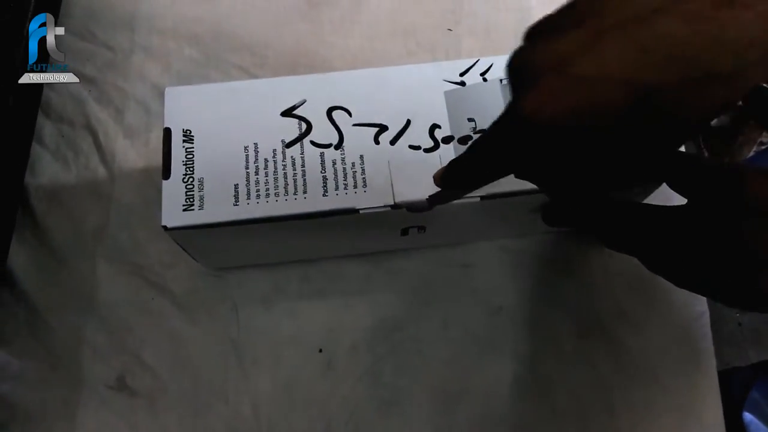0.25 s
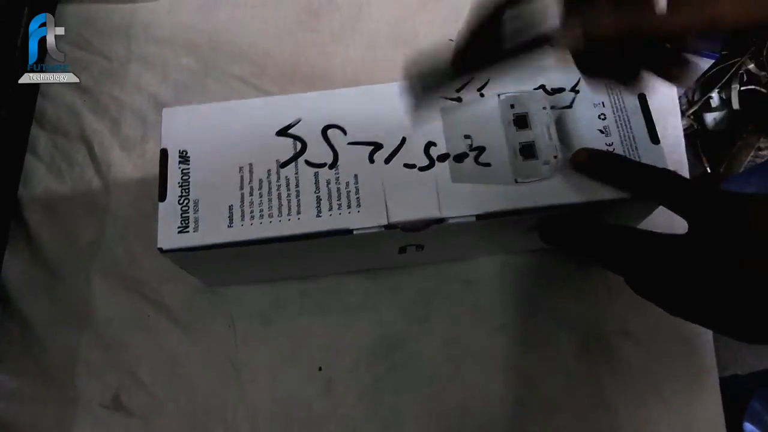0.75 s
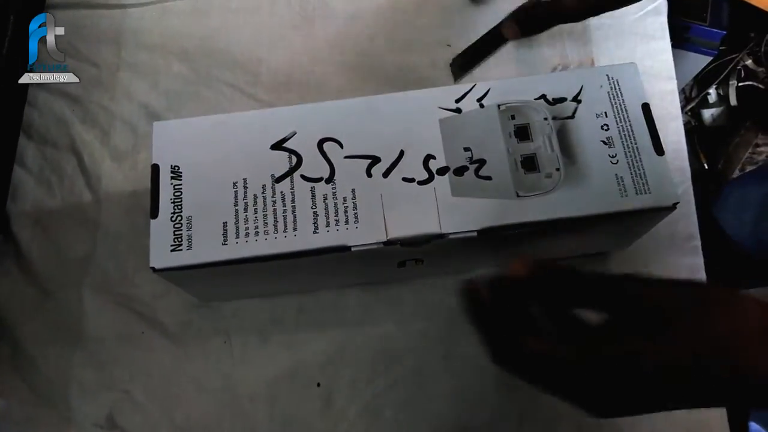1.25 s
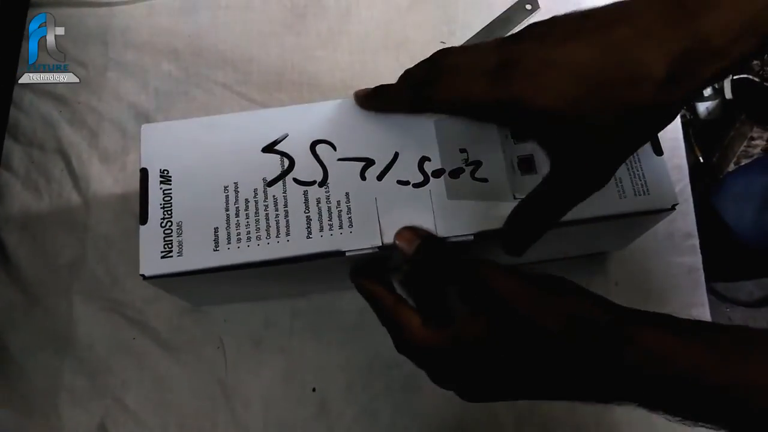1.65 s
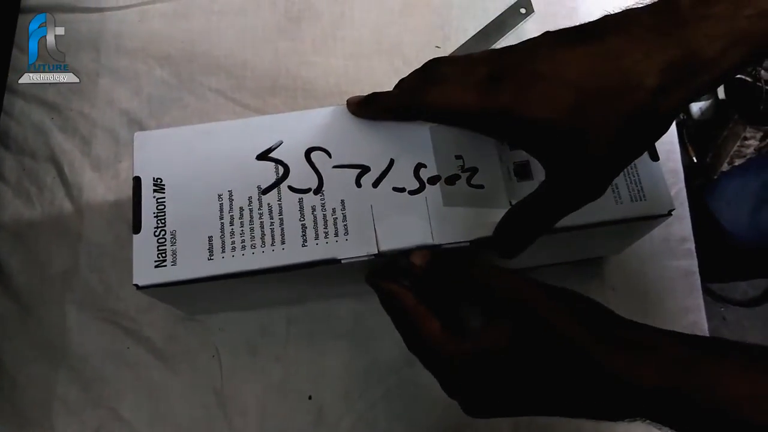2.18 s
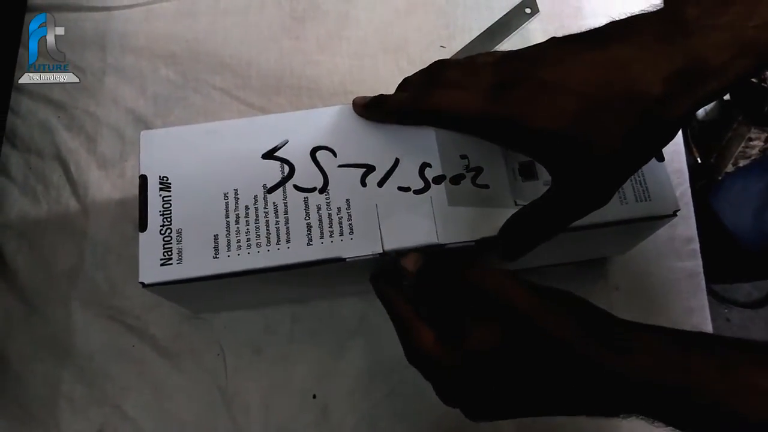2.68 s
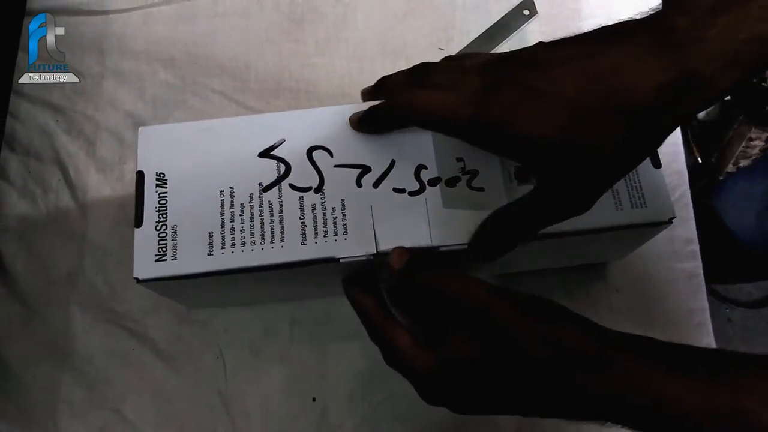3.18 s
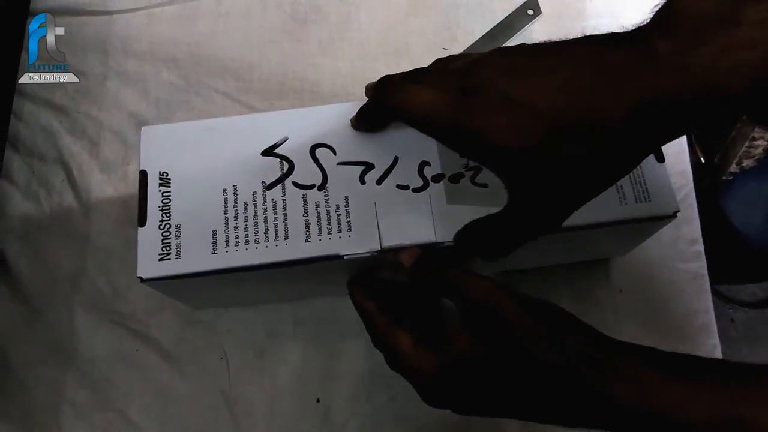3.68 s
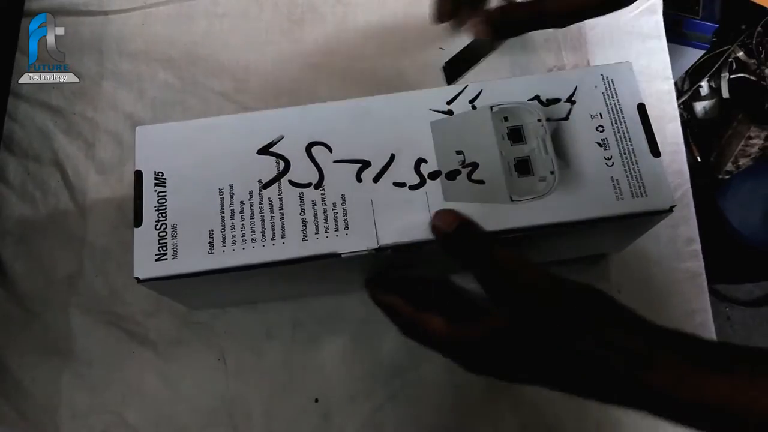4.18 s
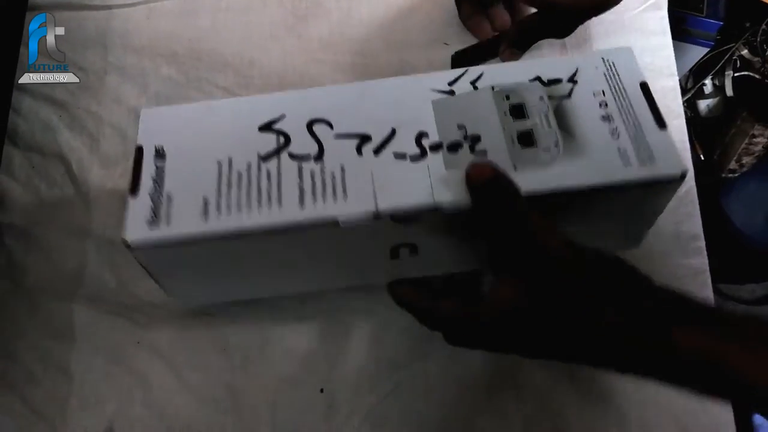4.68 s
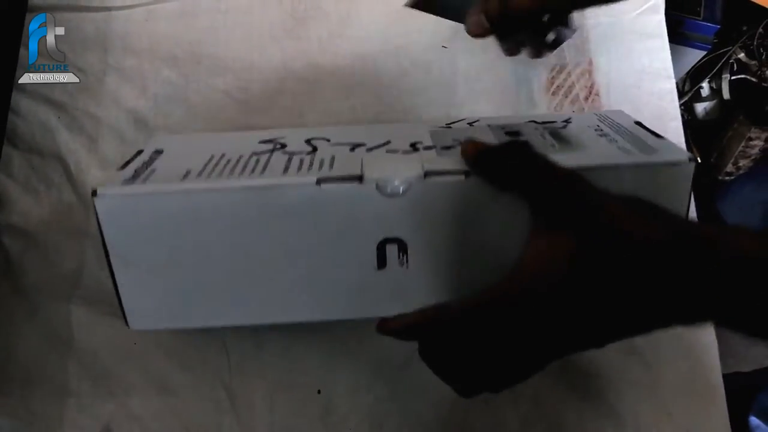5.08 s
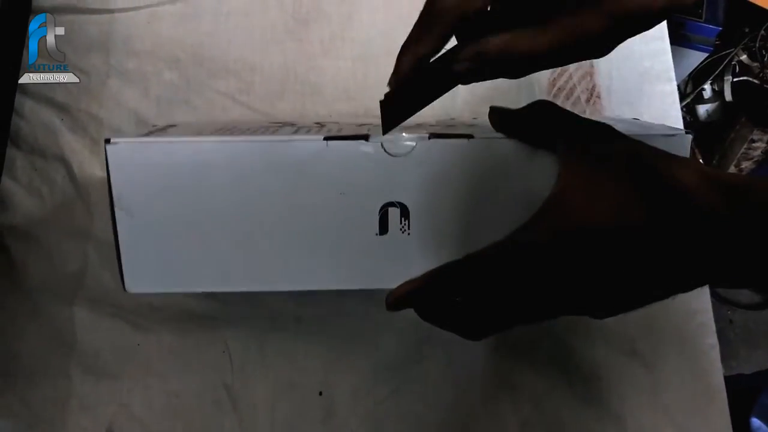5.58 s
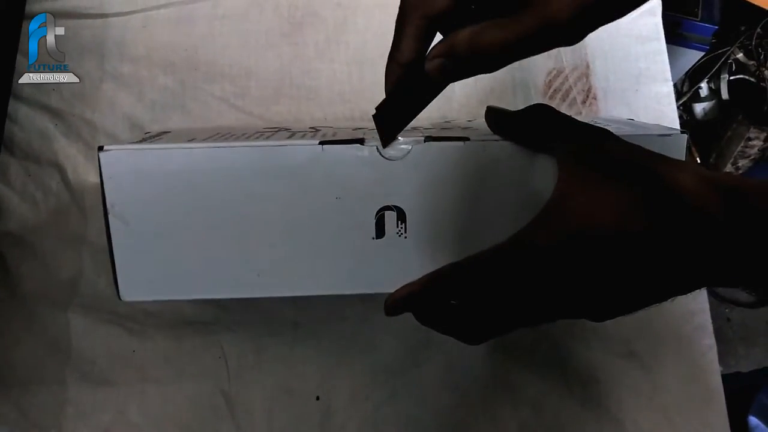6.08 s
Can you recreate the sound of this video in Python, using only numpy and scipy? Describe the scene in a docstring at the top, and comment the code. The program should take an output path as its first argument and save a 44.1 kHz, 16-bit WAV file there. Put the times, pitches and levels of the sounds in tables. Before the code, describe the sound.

A close stereo microphone in a small room with faint low rumble, light hiss and a short tail. From 0 to 0.6 seconds, fingers rub card and tape ticks weakly; a soft hollow box thump falls at 0.7. At about 1.17 a steel blade lands flat on the table with a hard clack and brief bright ring. Tape and card snaps resume at 1.3, with a strong crack at 1.95, scattered clicks after 2.1 and a dense crackling run at 2.7 to 2.8. At 3.3 the box face buckles with a dull, rounded pop. More snaps and rubs cluster at 3.8 to 4.0. From 4.4 to 5.0 the box is turned over cloth: low hollow drone, scuff, small juddering squeaks and boomy thumps around 4.7 to 4.85. It is then nearly quiet, until small cracks at 6.1 and 6.3 and a thin, raspy, wavering blade squeak from 6.25 to the end.

```python
"""Opening a taped box

Hands work at the taped flap of a long cardboard box on a table in a small room: tape and card snap as noise bursts,
fingers rub as patchy hiss, and short swelling sines give finger taps and juddering squeaks. A steel blade lands with
a clink of ringing modes, the box thumps and is rolled over cloth with a resonant drone and a scuff, and at last the
blade squeaks in the seal as a wavering tone with overtones. A low room rumble of shaped noise lies under it all."""
import sys
import numpy as np
from scipy import signal
from scipy.fft import rfft, irfft, next_fast_len
from scipy.io import wavfile
from scipy.ndimage import uniform_filter1d, map_coordinates

SR = 44100
rng = np.random.default_rng(int(sys.argv[2]) if len(sys.argv) > 2 else 0)


def generate_wav(signal):
    """Clip the signal to [-1, 1] and save it as 16-bit WAV at the path in sys.argv[1]."""
    frames = np.transpose(np.atleast_2d(signal))
    scaled = np.clip(frames, -1, 1) * 32767
    pcm = np.round(scaled).astype(np.int16)
    wavfile.write(sys.argv[1], SR, pcm)


N = 279977

# Levels in event tables are relative: each sound function may add its own trim.
# Spectrum of the room's air. Each row: frequency in Hz, relative level in dB.
RUMBLE_SPECTRUM = [(25, -14.5), (50, -3), (100, -5), (200, -12.5), (350, -22.5), (600, -27), (1200, -37),
                   (3000, -43), (14000, -58)]
# Swelling of the room's murmur. Each row: time in seconds, relative level in dB.
MURMUR_LEVEL = [(0.0, -59.5), (0.56, -54), (1.93, -62), (2.08, -57), (3.13, -67), (3.34, -54),
                (3.73, -66.5), (3.96, -52), (4.42, -61), (4.85, -44), (4.98, -57.5), (6.35, -64)]
# Fingers sliding on card and tape peeling.
# Each row: start in seconds, length in seconds, relative level in dB, treble tilt in dB per octave.
STROKES = [(0, 0.12, -52, -3.5), (0.27, 0.035, -48, -7.5), (0.47, 0.08, -38.5, -4),
           (0.74, 0.2, -64.5, -7.5), (0.911, 0.16, -58.5, 12), (1.409, 0.14, -50, 3.5),
           (1.855, 0.13, -42, 4.5), (2.118, 0.044, -45.5, -1.5), (2.348, 0.027, -42, -1),
           (2.486, .045, -49.5, 4.5), (2.687, 0.038, -38, -11), (3.023, 0.08, -59, 15),
           (3.87, 0.022, -29, -7), (3.948, 0.081, -37.5, 1), (4.102, 0.066, -53, 8.5),
           (4.532, 0.22, -49.5, -1), (4.732, 0.148, -48.5, 1), (5.09, 0.085, -61.5, 0.5),
           (5.168, 0.093, -55.5, 1.5), (5.9, 0.11, -76.5, -2), (6.283, 0.036, -38, -8)]
# Spectrum of skin on card. Each row: frequency in Hz, level in dB.
SKIN_SPECTRUM = [(600, -42), (1100, -17), (1500, -14), (2300, -11), (3200, -7.5), (5000, -1), (7200, 6.5),
                 (9000, -5), (12000, -6), (14500, -7.5), (16000, -24.5)]
# Tape and card giving way.
# Each row: time in seconds, relative crack level in dB, relative card level in dB, treble tilt in dB per octave.
SNAPS = [(0.126, -32.5, -62, 15), (0.2651, -27, -74, -23), (0.398, -38, -53, 15), (0.454, -27, -76, 8),
         (0.48, -15.5, -44, 5), (0.5374, -14.5, -46, -14), (0.5495, -15.5, -55.5, 3.5),
         (1.3083, -13, -44, -5.5), (1.489, -10, -58, -1), (1.5915, -10, -59.5, -6.5),
         (1.5993, -8.5, -52, -2), (1.952, 5.5, -25.5, -1.85), (1.9793, -7, -41, 0.2),
         (2.1345, -12, -53.5, 4.5), (2.2932, -13.5, -53, 4.5), (2.3045, -2.5, -45, -3.5),
         (2.3775, -5, -44.5, 0), (2.6942, 3, -37.5, 8), (2.7009, -6, -43, 8.5), (2.7106, -2.5, -41, -1),
         (2.7214, 3, -45.5, -1.5), (2.7392, -5, -36.5, 6.5), (2.7532, 0.5, -33.5, -3),
         (2.7761, -10, -35, -3), (2.9103, -16, -65, -9.5), (3.3, -9.5, -37, 14.5), (3.3632, -7.5, -47, -3),
         (3.4488, -17, -67, 10.5), (3.461, -12, -65.5, 0.5), (3.7765, -14.5, -59, 2),
         (3.8159, -16, -50.5, -1.5), (3.8834, -16.5, -28, 5), (3.8875, -8, -29, -2.5),
         (3.9632, -2.5, -33, 6.5), (3.982, 1.5, -34, 1), (4.4202, -6.5, -70.5, 5.5), (4.5179, -9.5, -66, 7),
         (4.744, -28, -65, 9), (5.401, -35, -74, 2), (5.4141, -20, -73.5, 1.5), (5.7771, -44.5, -78, -6),
         (6.115, -13, -55.5, -2.5), (6.3056, -13, -48, 7), (6.3185, -8.5, -62, 2)]
# Spectrum of cracking tape. Each row: frequency in Hz, level in dB.
CRACK_SPECTRUM = [(100, -53.5), (1500, -28.5), (2400, -30.5), (3000, 1.5), (5300, 6.5), (6800, 10),
                  (8700, -2.5), (11500, -8.5), (14000, -7), (16000, -20.5)]
# Spectrum of barking card. Each row: frequency in Hz, level in dB.
CARD_SPECTRUM = [(100, -37), (450, -8.5), (700, -16.5), (1200, -3.5), (1600, 1), (2200, -4), (3000, 2.5),
                 (5000, -11.5), (16000, -55.5)]
# Resonances of a flexing face of the box. Each row: frequency in Hz, width in Hz, level in dB.
PANEL_RESONANCES = [(437.4, 140, -5), (590, 43, -3)]
# The box knocks on the table. Each row: start in seconds, air cavity level in dB, wall level in dB.
THUMPS = [(0.484, -41, -60.5), (0.706, -19.5, -43.5), (0.826, -35.5, -79), (1.175, -48.5, -48.5),
          (1.954, -62, -51), (3.303, -54, -44.5), (3.985, -62, -53), (4.691, -20, -76), (4.778, -20.5, -65),
          (4.834, -19, -76), (4.95, -44.5, -85.5)]
# Modes of the air in the box. Each row: frequency in Hz, level in dB, 60 dB decay time in seconds.
CAVITY_MODES = [(112.5, 5.5, 0.33), (85.16, -15.5, 0.62), (156, -9, 0.36), (200.4, -14.5, 0.48)]
# Resonances of the box walls. Each row: frequency in Hz, width in Hz, level in dB.
WALL_RESONANCES = [(214, 8.2, 6), (286.6, 43, 2), (359, 20, -0.5), (560.3, 22, 0.5), (995, 32, -12),
                   (1200, 54, -41), (1820, 210, -20)]
# Spectrum of the shudder that drives the walls. Each row: frequency in Hz, level in dB.
SHUDDER_SPECTRUM = [(1500, 6.5), (2500, 2), (6000, -5.5)]
# Short notes from the card: finger taps on the box face near 560-590 Hz, juddering squeaks at other pitches.
# Each row: centre time in seconds, pitch in Hz, level in dB, width of the swell in seconds.
CHIRPS = [(0.485, 587, -40.5, 0.015), (0.51, 1470, -53.5, 0.065), (0.884, 568, -36, 0.013),
          (1.059, 1360, -61, 0.036), (1.312, 567, -33.5, 0.0074), (4.357, 1233, -60.5, 0.023),
          (4.413, 799, -49, 0.041), (4.688, 590, -39, 0.027), (4.747, 955, -28, 0.041),
          (4.815, 564, -31.5, 0.03)]
# Modes of the blade. Each row: frequency in Hz, relative level in dB, 60 dB decay time in seconds.
STEEL_MODES = [(478, -2.5, 0.13), (2300, -15, .19), (3333, 8, 0.061), (4300, -15, .17), (5227, -10, .2),
               (6360, -3, 0.36), (7040, -5.5, 0.33), (7650, -5.5, 0.3), (7700, -21, .18),
               (8040, -6.5, 0.18), (8950, -12.5, 0.16), (10600, -21.5, 0.14), (12400, -29, 0.12),
               (13100, -24.5, .18)]
# Spectrum of the table under the blade. Each row: frequency in Hz, level in dB.
TABLE_SPECTRUM = [(150, -39.0), (500, -1.5), (1400, 1.5), (3300, 5.5), (5000, -1.0), (8000, -18.5), (14000, -52.0)]
# The box is pushed over the cloth.
# Each row: start in seconds, time until the fall in seconds, drone level in dB, scuff level in dB.
SHOVES = [(4.40, 0.053, -34.5, -56.5), (4.674, 0.14, -35.5, -35), (4.95, 0.088, -47.5, -71.5)]
# Spectrum of the scuff. Each row: frequency in Hz, level in dB.
SCUFF_SPECTRUM = [(120, -34), (280, 5.5), (560, 3.5), (720, -10), (950, -6), (1300, -9.5), (1700, -32),
                  (2500, -53), (3800, -39.5), (6000, -48)]
# The blade sticks and slips in the seal. Each row: time in seconds, pitch in Hz, relative fundamental level in dB,
# overtone level in dB, overtone tilt in dB per octave.
SQUEAK_PATH = [(6.246, 486, -85, -100, 8), (6.251, 497.3, -39.5, -40, 12), (6.271, 499, -44, -44.5, 0),
               (6.279, 493.5, -30.5, -43, -4), (6.31, 490.4, -28.5, -46.5, -6.5),
               (6.35, 496, -31.5, -47, -11)]
# Overtones of the squeak. Each row: multiple of the pitch, relative level in dB.
OVERTONES = [(3, 1), (4, -13), (5, -2.5), (6, -19), (7, -3), (8, -12), (9, -5), (11, -7.5), (13, -18)]
# Spectrum of the scrape in the squeak. Each row: frequency in Hz, level in dB.
GRIT_SPECTRUM = [(900, -25), (1500, -3), (3500, 0), (5500, -3), (9000, -16)]
# Decay of the room. Each row: frequency in Hz, 60 dB decay time in seconds.
ROOM_DECAY = [(100, 0.14), (500, .36), (1500, 0.24), (4000, 0.41), (8000, 0.38), (14000, 0.4)]
# Colour of the room's tail. Each row: frequency in Hz, level in dB.
ROOM_SPECTRUM = [(120, 4.0), (450, 5.0), (1500, 4.5), (4000, -2.5), (7000, -7.5), (12000, -7.0)]
# Diffuse sound at the two ports. Each row: frequency in Hz, left-right likeness from 0 to 1.
LIKENESS = [(150, 0.96), (500, 0.65), (1200, 0.12), (3000, .1)]
# Balance of the microphone ports. Each row: frequency in Hz, left minus right in dB.
PORT_BALANCE = [(150, -1.5), (450, -0.5), (800, -2.5), (1500, -2.5), (2500, -1), (4700, 3.5), (6700, 4.5),
                (9000, 0), (10300, -16.5), (12000, -25.5), (14000, -14.5), (15500, -9.5)]
# Response shared by both ports. Each row: frequency in Hz, level in dB.
PORT_RESPONSE = [(25, -16.5), (38, -8.5), (48, -0.5), (5000, -1.0), (9000, 3.0), (12000, 1), (14200, -0.5), (14800, -10)]


def amp(db):
    """Decibels to gain."""
    return 10 ** (np.asarray(db) / 20)


def unit(x):
    """Scale x to an rms of 1."""
    return x / np.sqrt(np.mean(x ** 2) + 1e-20)


def along(points, hz):
    """Read a curve of (Hz, value) points on a log frequency axis."""
    f, v = np.transpose(points)
    return np.interp(np.log(hz + 1), np.log(f + 1), v)


def curves(rows):
    """Draw one value per sample for each column after the time."""
    s, *columns = np.transpose(rows)
    return [np.interp(np.arange(N) / SR, s, column) for column in columns]


def during(rows):
    """A soft gate, open for the span of a curve."""
    t = np.arange(N) / SR
    is_open = (t > rows[0][0]) & (t < rows[-1][0])
    return uniform_filter1d(1. * is_open, size=128)


def wobble(rate):
    """A smooth random curve with rate knots a second."""
    knots = rng.standard_normal(int(N * rate / SR) + 4)
    return map_coordinates(knots, [np.arange(N) * rate / SR])


def filtered(x, response):
    """Multiply the spectrum of x by a complex response of frequency."""
    n = x.shape[-1]
    m = next_fast_len(n + 8192)
    return irfft(rfft(x, m) * response(np.fft.rfftfreq(m, 1 / SR)), m)[..., :n]


def coloured(x, points):
    """Shape x with a causal, minimum-phase filter through (Hz, dB) points."""
    size = 1024
    gain = amp(along(points, np.fft.rfftfreq(size, 1 / SR)))
    cepstrum = irfft(np.log(gain))
    # folding the cepstrum forward puts all the energy after the onset
    cepstrum[1:size // 2] *= 2
    cepstrum[size // 2 + 1:] = 0
    impulse = irfft(np.exp(rfft(cepstrum)))
    return signal.fftconvolve(x, impulse)[:len(x)]


def tilted(points, tilt):
    """Lean a (Hz, dB) shape about 8 kHz by tilt dB per octave, holding the lean below 2.5 kHz."""
    return [(hz, db + tilt * np.log2(max(hz, 2500) / 8000)) for hz, db in points]


def resonate(x, peaks):
    """Drive parallel (Hz, width, dB) resonances with x."""
    def response(f):
        return sum(amp(db) * 1j * f * w / (c * c - f * f + 1j * f * w) for c, w, db in peaks)
    return filtered(x, response)


def ring(modes, t):
    """Sum decaying sine modes, at slightly new strengths for each blow."""
    out = 0
    for hz, db, t60 in modes:
        strength = db + rng.normal(0, 1)
        out = out + amp(strength - 60 * t / t60) * np.sin(2 * np.pi * hz * t)
    return out


def add(track, s, sound):
    """Mix a sound into a track at time s."""
    part = track[..., max(round(s * SR), 0):][..., :sound.shape[-1]]
    part += sound[..., :part.shape[-1]]


def burst(t, t60, linger_db, linger_t60, lead_db=-24, lead_rise=0.00073):
    """Noise with a faint lead around t = 0, a fast burst after it and a weaker lingering decay."""
    after = np.maximum(t, 0)
    decay = amp(-60 * after / t60) + amp(linger_db - 60 * after / linger_t60)
    onset = 1 - np.exp(-after / 0.0007)
    lead = amp(lead_db) * np.exp(-np.abs(t) / lead_rise)
    return (decay * onset + lead) * rng.standard_normal(len(t))


def diffuse(pair):
    """Blend two unrelated signals for the ports: alike in the bass, apart in the treble."""
    def response(hz):
        turn = np.arccos(np.clip(along(LIKENESS, hz), -1, 1)) / 2
        return np.array([np.cos(turn), np.sin(turn)])
    mid, side = filtered(pair, response)
    return np.array([mid + side, mid - side])


def rumble(level_db=8, hum_db=-65, hiss_db=-53, throb_db=2):
    """A low noise murmur swells and sinks over a steady faint hiss and a weak 44 Hz hum."""
    level, = curves(MURMUR_LEVEL)
    noise = rng.standard_normal((2, N))
    air = unit(diffuse(filtered(noise, lambda hz: amp(along(RUMBLE_SPECTRUM, hz)))))
    murmur = filtered(air, lambda hz: 1 / (1 + (hz / 260) ** 4))
    hiss = air - murmur
    hum = unit(np.sin(2 * np.pi * 44.0 * np.arange(N) / SR) * amp(1.5 * wobble(5)))
    return amp(level + level_db + throb_db * wobble(10)) * murmur + amp(hiss_db) * hiss + amp(hum_db) * hum


def rub(catch_db=-2, catches_per_s=250, patchy_db=6.5, jerky_db=4, rise_s=.008, edge_s=.003):
    """Skin hisses over the card in shifting patches of noise and catches on single fibres as random clicks."""
    fibres = (rng.random(N) < catches_per_s / SR) * amp(8.4 * rng.standard_normal(N))
    friction = rng.standard_normal(N) + amp(catch_db) * unit(fibres)
    z = signal.stft(friction, nperseg=512)[2]
    # random gains, smoothed over frequency and then over time
    patches = uniform_filter1d(rng.standard_normal(z.shape), size=3, axis=0)
    patches = unit(uniform_filter1d(patches, size=6, axis=1))
    slide = signal.istft(z * amp(patchy_db * patches), nperseg=512)[1][:N]
    slide = slide * amp(jerky_db * wobble(70))
    out = np.zeros(N)
    for s, length, db, tilt in STROKES:
        piece = slide[round(s * SR):][:round(length * SR)]
        t = np.arange(len(piece)) / SR
        fade = np.tanh(t / rise_s) * np.tanh(t[::-1] / edge_s)
        add(out, s, amp(db) * fade * unit(coloured(piece, tilted(SKIN_SPECTRUM, tilt))))
    return out


def crackling(crack, before_db=-23, before_s=0.0025, after_db=-24, after_s=0.014, count=2):
    """A weak fibre parts just before each crack and a few more follow, as faint shifted copies."""
    out, chance = crack.copy(), rng.standard_normal((count + 1, 2))
    for k, (when, size) in enumerate(chance):
        s, db = (k * after_s, after_db) if k else (-before_s, before_db)
        shift = round(np.clip(s * np.exp(0.3 * when), -0.01, 0.04) * SR)
        out += amp(db + 2 * size) * np.roll(crack, shift, axis=-1)
    return out


def rippled(x, depth_db, width_hz):
    """The sheet beams some frequencies at the ports and others past them: a random ripple in the spectrum."""
    def gain(hz):
        return amp(depth_db * map_coordinates(rng.standard_normal(1200), [hz / width_hz]))
    return filtered(x, gain)


def flexing(t):
    """The face of the box rings after a short push at t = 0."""
    push = (t > 0) * (1 - t / 0.00085) * np.exp(-np.abs(t) / 0.00082)
    return unit(resonate(push, PANEL_RESONANCES))


def snaps(crack_db=-28, card_db=-3, flex_db=-18.5, apart_db=-6, skew_db=-4, delay_s=.0008):
    """Each snap is a bright crack, a bark of the card and a push on the face, which also pops once.

    Returns the stereo sound sent to the ports and the mono sound sent all round."""
    sheets, flex, around = np.zeros((2, N)), pop(), np.zeros(N)
    t = np.arange(-SR // 80, SR // 16) / SR
    face = flexing(t)
    for s, crack, card, tilt in SNAPS:
        start = s + delay_s + t[0]
        slope = tilted(CRACK_SPECTRUM, tilt)
        # a common part and a difference part: the two ports see the tape from different sides
        tape = np.array([unit(coloured(burst(t, t60=0.0032, linger_db=-27, linger_t60=0.045), slope))
                         for _ in range(2)])
        bark = np.array([unit(coloured(burst(t, t60=0.03, linger_db=-19.0, linger_t60=0.11), CARD_SPECTRUM))
                         for _ in range(2)])
        sheet = amp(crack + crack_db) * crackling(tape) + amp(card + card_db) * bark
        # the ripple leaves the strength of each part as it was
        beamed = [np.std(part) * unit(rippled(part, depth_db=5.0, width_hz=400)) for part in sheet]
        add(sheets, start, np.array(beamed))
        add(around, start, sheet[0])
        add(flex, start, amp(card + flex_db) * face)
    late_flex = np.roll(flex, SR // 1800)
    mid = sheets[0] + flex
    side = amp(apart_db) * sheets[1] + amp(skew_db) * late_flex
    return np.array([mid + side, mid - side]), around + flex


def thumps(cavity_rise_s=0.0066, rattle_t60=0.11):
    """Soft blows: the walls shudder at once, the hollow of the box swells and booms."""
    out, t = np.zeros(N), np.arange(SR // 2) / SR
    for s, cavity_db, wall_db in THUMPS:
        shudder = coloured(burst(t, t60=0.027, linger_db=-22, linger_t60=rattle_t60), SHUDDER_SPECTRUM)
        boom = ring(CAVITY_MODES, t) * (1 - np.exp(-t / cavity_rise_s))
        add(out, s, amp(cavity_db) * boom)
        add(out, s, amp(wall_db) * unit(resonate(shudder, WALL_RESONANCES)))
    return out


def chirps(waver_rad=0.78):
    """Finger taps on the box face and juddering squeaks: short sines that swell, waver in phase and fade."""
    out, t = np.zeros(N), np.arange(-SR // 10, SR // 10) / SR
    for s, hz, db, length in CHIRPS:
        drift = map_coordinates(rng.standard_normal(40), [np.linspace(0, 39, len(t))])
        note = np.sin(2 * np.pi * hz * t + waver_rad * drift)
        add(out, s + t[0], amp(db) * np.exp(-(2 * t / length) ** 2) * note)
    return out


def clink(s=1.1745, ring_db=-32, clack_db=-39, tick_db=-39, chatter=0.46):
    """The blade lands flat on the table: a clack, a hard tick and a short steel ring that chatters."""
    out, t = np.zeros(N), np.arange(SR // 2) / SR
    clack = coloured(burst(t, t60=0.02, linger_db=-21, linger_t60=0.13), TABLE_SPECTRUM)
    tick = coloured(1. * (t == 0), TABLE_SPECTRUM)
    steel = sum(ring([mode], t) * (1 + chatter * wobble(110)[:len(t)]) for mode in STEEL_MODES)
    add(out, s, amp(ring_db) * steel + amp(clack_db) * unit(clack))
    add(out, s + 0.0014, amp(tick_db) * unit(tick))
    return out


def pop(s=3.3016, hz=453.3, level_db=-8, rise_s=0.0022):
    """The pressed face of the box buckles once and swings through a few strongly damped cycles."""
    out, t = np.zeros(N), np.arange(SR // 16) / SR
    u = t / rise_s
    swing = (u * np.exp(1 - u)) ** 3 * np.sin(2 * np.pi * hz * t)
    add(out, s, amp(level_db) * swing)
    return out


def swell(s, length, rise_s, fall_db_per_s):
    """A push builds up from s and dies away once its length is over."""
    t = np.arange(N) / SR - s
    return np.clip(t / rise_s, 0, 1) ** 2 * amp(-fall_db_per_s * np.maximum(t - length, 0))


def roll(slips_per_s=260):
    """The turning box drags over the cloth in small dull slips; its hollow drones and a slower scuff builds up."""
    drone = sum(amp(db) * swell(s, length, rise_s=0.028, fall_db_per_s=136) for s, length, db, _ in SHOVES)
    scuff = sum(amp(db) * swell(s, length, rise_s=0.063, fall_db_per_s=305) for s, length, _, db in SHOVES)
    slips = unit((rng.random(N) < slips_per_s / SR) * rng.standard_normal(N))
    jerks = slips + .5 * rng.standard_normal(N)
    hollow = unit(resonate(resonate(jerks, [(179.6, 46, 0)]), [(180, 61, 0)]))
    return drone * hollow + scuff * unit(coloured(jerks, SCUFF_SPECTRUM))


def squeak(level_db=-2, flutter_db=4, jitter_rad=0.47, waver=0.0123, grit_db=-5):
    """Stick and slip swing the blade: the pitch wavers, the overtones flutter and noise scrapes with each swing."""
    hz, fundamental, overtones, tilt = curves(SQUEAK_PATH)
    phase = 2 * np.pi * np.cumsum(hz * (1 + waver * wobble(120))) / SR
    rasp = np.zeros(N)
    for k, db in OVERTONES:
        strength = amp(db + tilt * np.log2(k / 5) + flutter_db * wobble(110))
        rasp += strength * np.sin(k * phase + jitter_rad * wobble(200))
    # the scrape swells twice per cycle
    grit = unit(coloured(rng.standard_normal(N) * np.cos(phase) ** 4, GRIT_SPECTRUM))
    tone = amp(fundamental + level_db) * unit(np.sin(phase))
    return during(SQUEAK_PATH) * (tone + amp(overtones) * (rasp + amp(grit_db) * grit))


def direct(pair):
    """The box lies a little to the right, so the left port hears it late."""
    lag = 4 / SR  # seconds between the ports
    return filtered(pair, lambda hz: np.exp(1j * np.pi * hz * lag * np.array([[-1], [1]])))


def room(x, gap_s=0.0021):
    """The walls answer with a noise tail in which each frequency dies at its own speed."""
    hz, t, z = signal.stft(rng.standard_normal((2, SR // 2)), SR, nperseg=256)
    decay = amp(-60 * t / along(ROOM_DECAY, hz)[:, None])
    tail = diffuse(signal.istft(z * decay, SR, nperseg=256)[1])
    tail = tail * (1 - np.exp(-(np.arange(tail.shape[1]) / SR / gap_s) ** 2))
    tail = tail / np.linalg.norm(tail[0])
    tail = filtered(tail, lambda f: amp(along(ROOM_SPECTRUM, f)))
    return signal.fftconvolve(x[None], tail, axes=1)[:, :N]


def scene():
    """Mix all handling sounds, near and by way of the walls, over the rumble."""
    fingers = rub()
    cracks, cracks_around = snaps()
    knocks = thumps() + chirps() + roll()
    blade = clink()
    tone = squeak()
    balanced_tone = tone * amp([[1.5], [-1.5]])  # gains of +1.5 dB and -1.5 dB, ahead of the port responses
    near = direct(cracks + knocks + blade + amp(-3) * fingers + balanced_tone)
    far = amp(-10.0) * cracks_around + amp(-9) * knocks + amp(-7.5) * blade
    far = far + amp(-4.5) * fingers + amp(-7) * tone
    return near + room(far) + rumble()


def record(dry, top_hz=15600):
    """Each microphone port has its own treble response; deep bass and the top are cut steeply."""
    def response(hz):
        balance = along(PORT_BALANCE, hz) * np.array([[.5], [-.5]])
        return amp(balance + along(PORT_RESPONSE, hz))
    ports = np.clip(filtered(dry, response), -1, 1)
    return filtered(ports, lambda hz: np.clip((top_hz + 150 - hz) / 300, 0, 1))


dry = scene()
out = record(dry)
generate_wav(out)
```